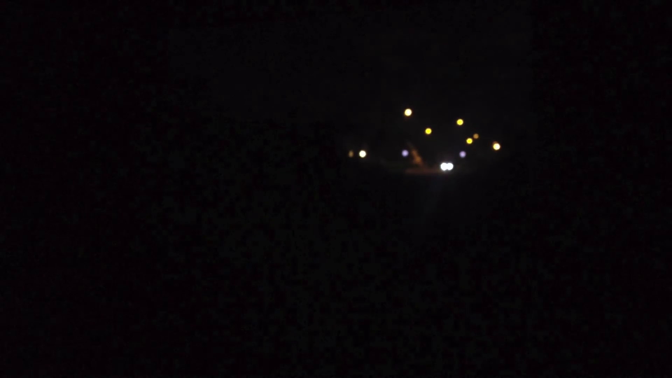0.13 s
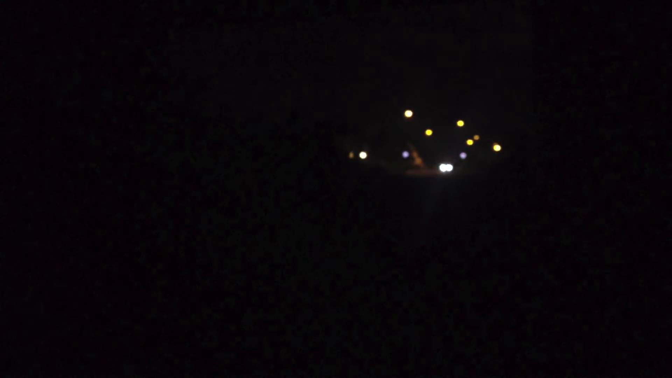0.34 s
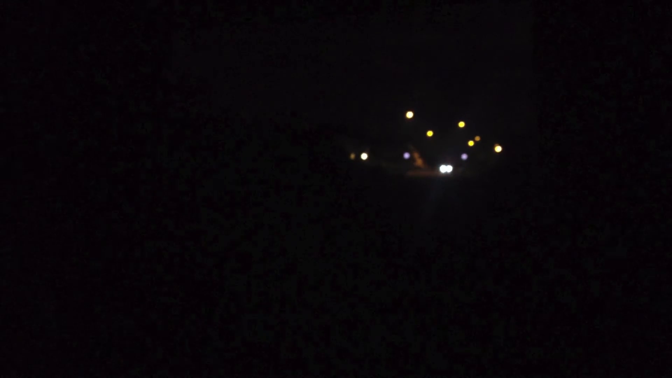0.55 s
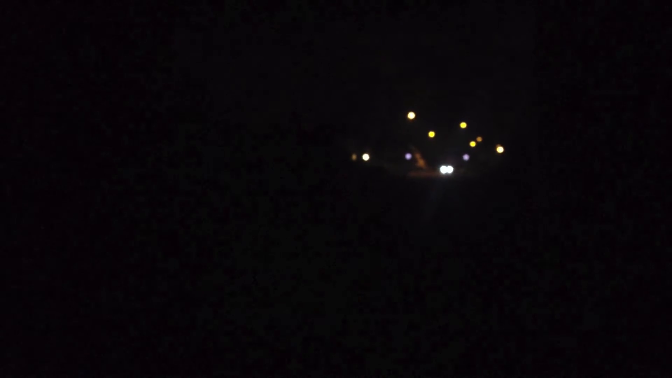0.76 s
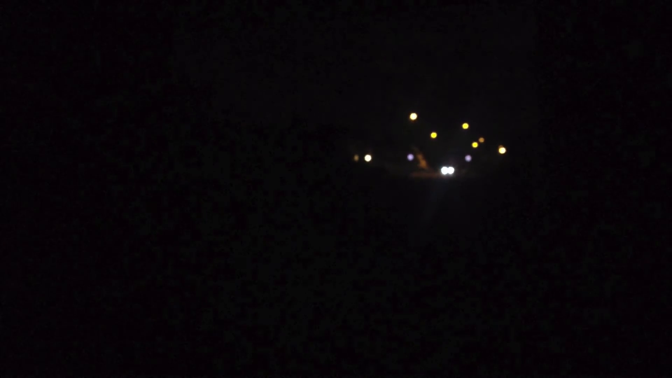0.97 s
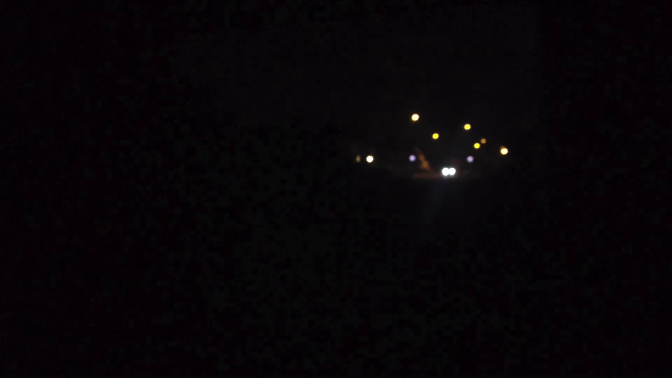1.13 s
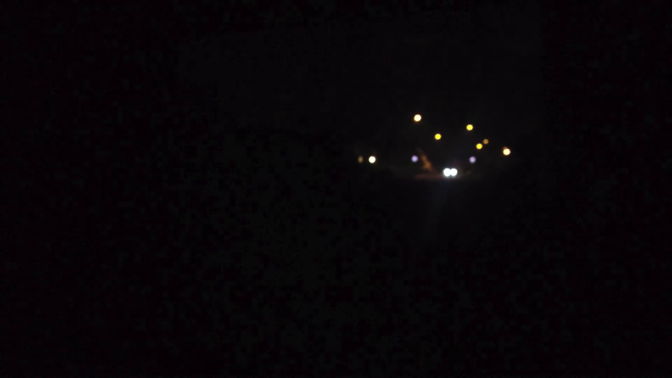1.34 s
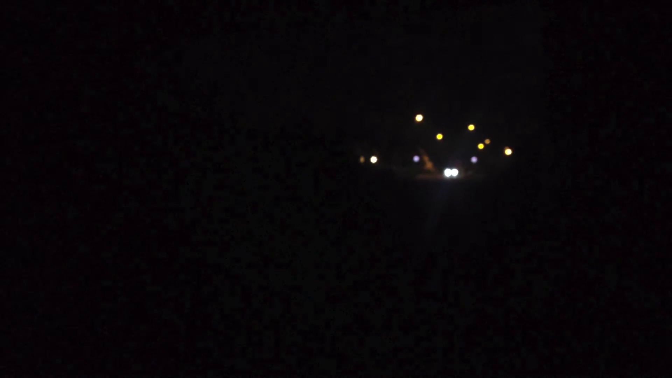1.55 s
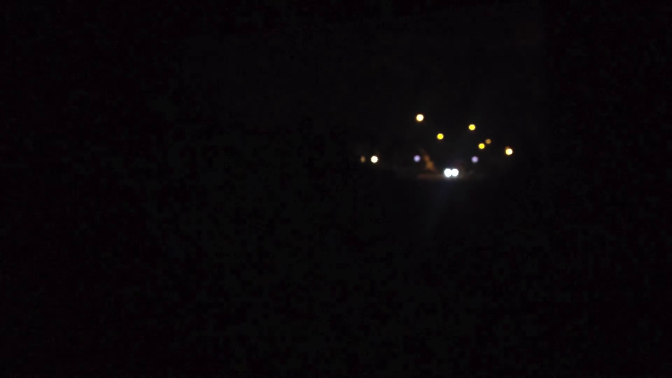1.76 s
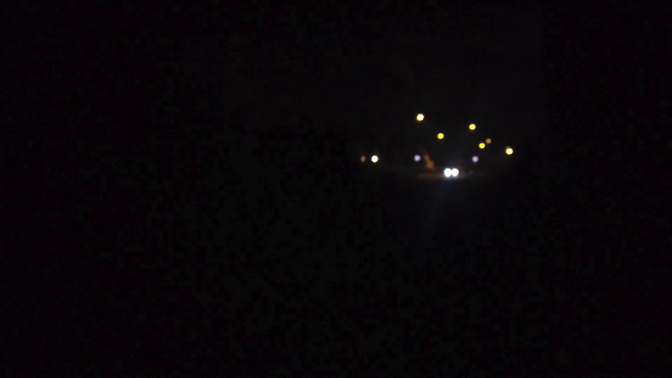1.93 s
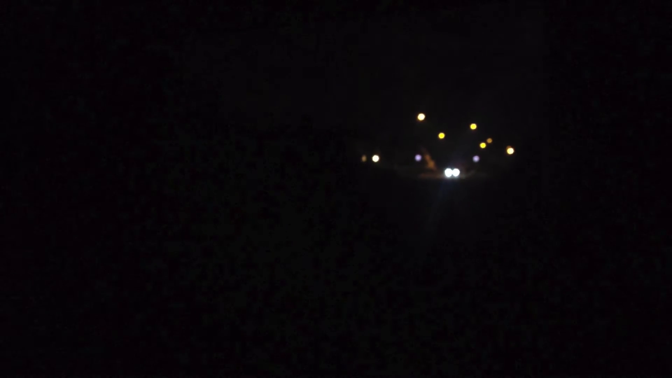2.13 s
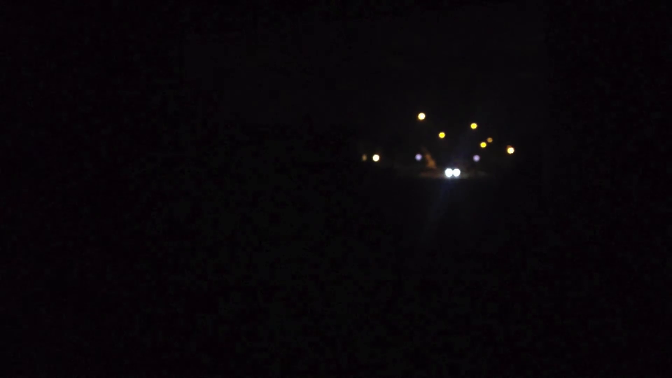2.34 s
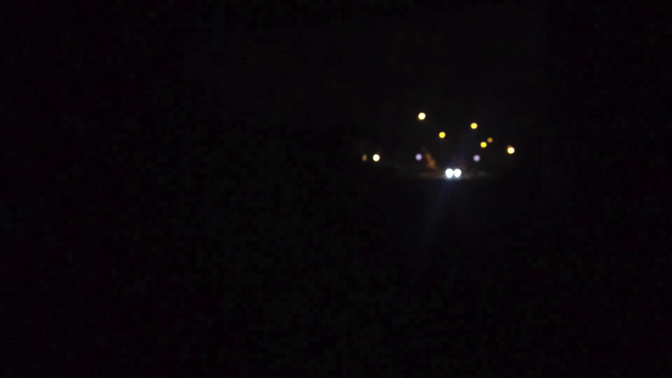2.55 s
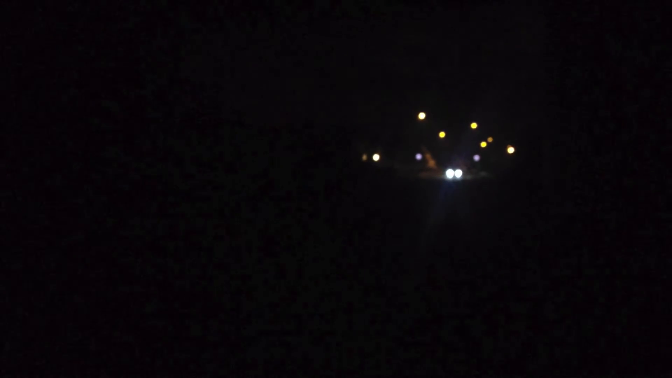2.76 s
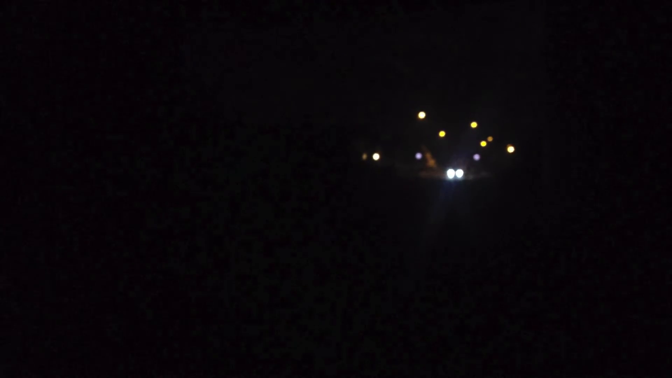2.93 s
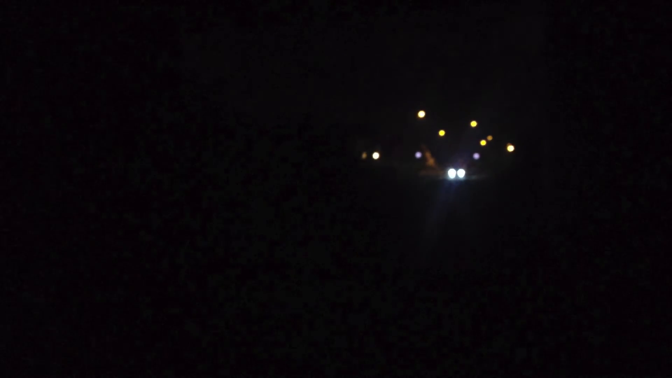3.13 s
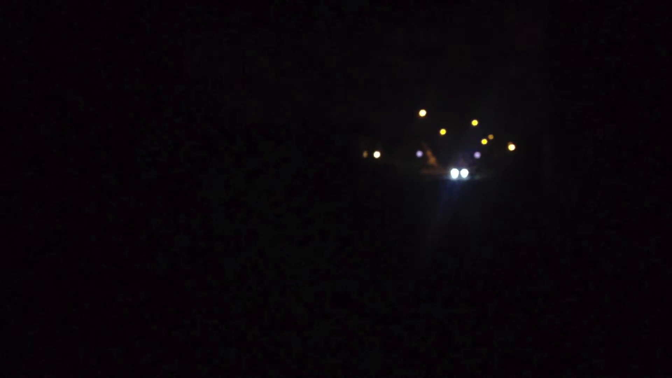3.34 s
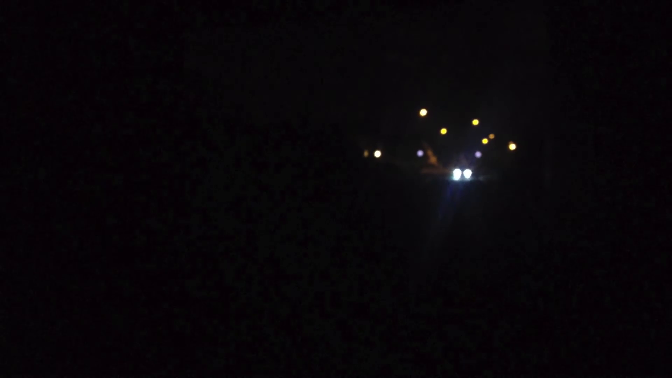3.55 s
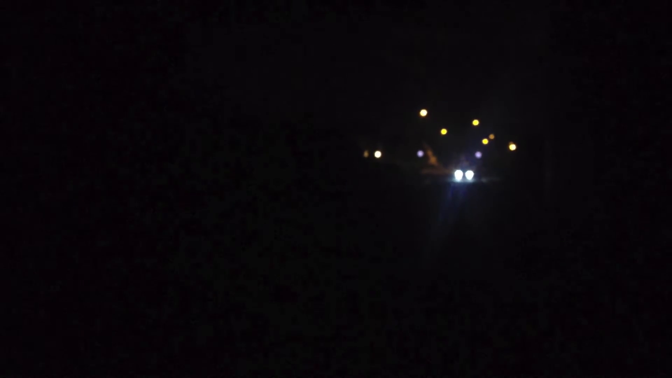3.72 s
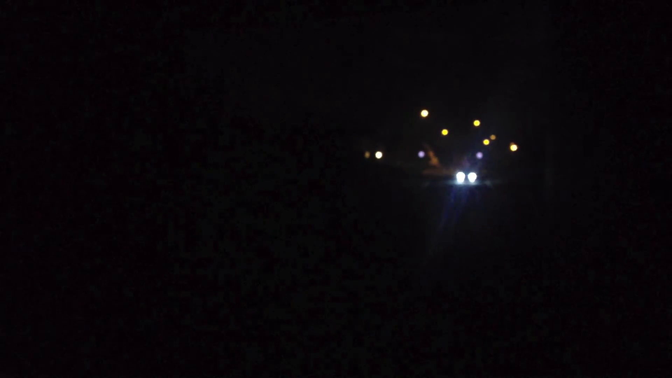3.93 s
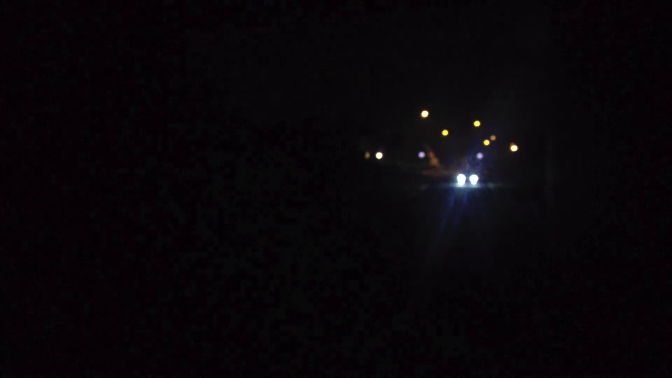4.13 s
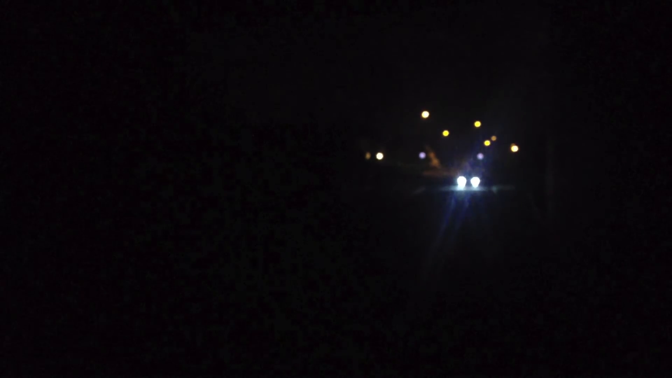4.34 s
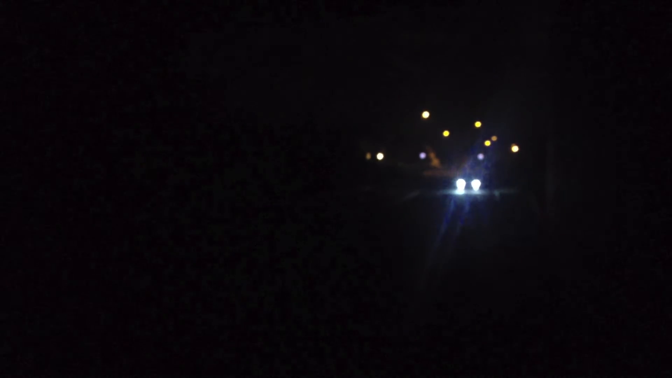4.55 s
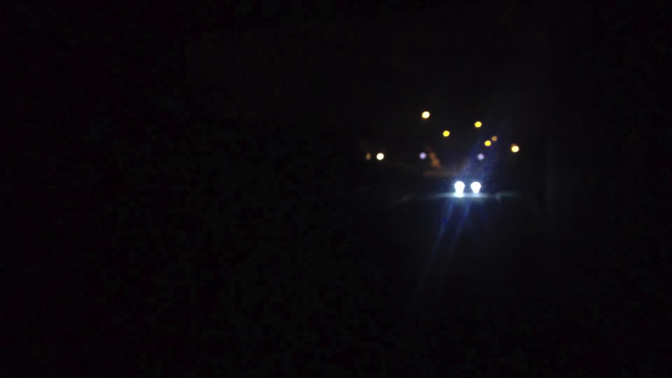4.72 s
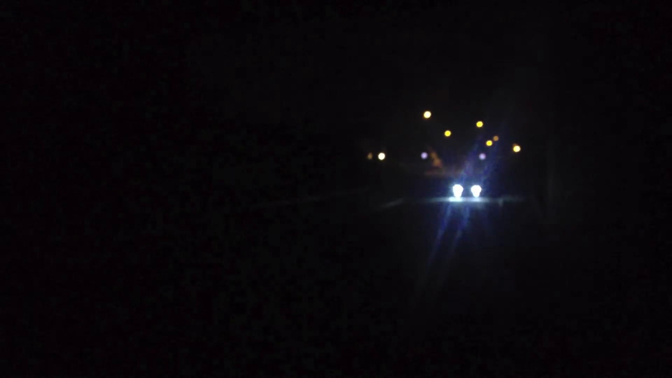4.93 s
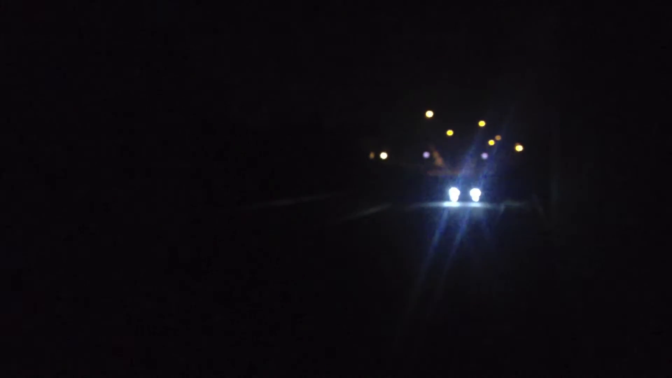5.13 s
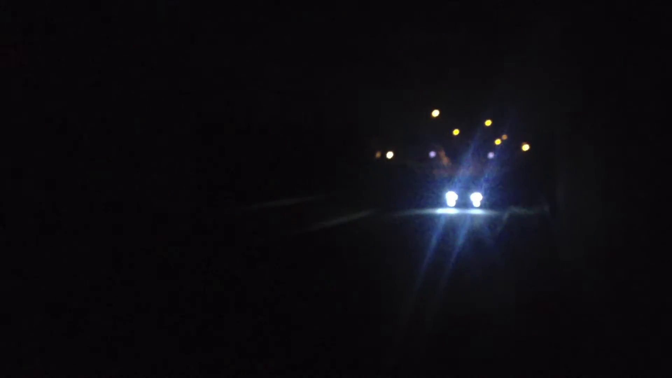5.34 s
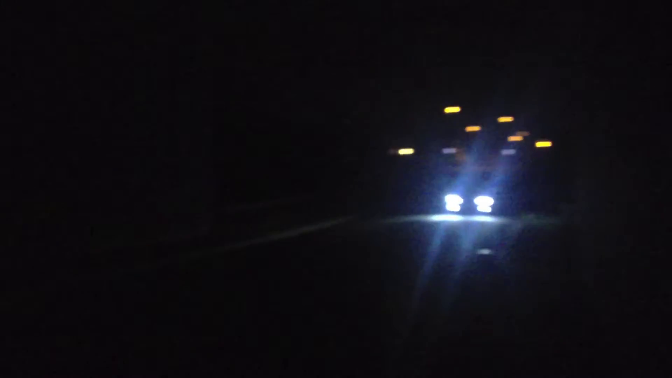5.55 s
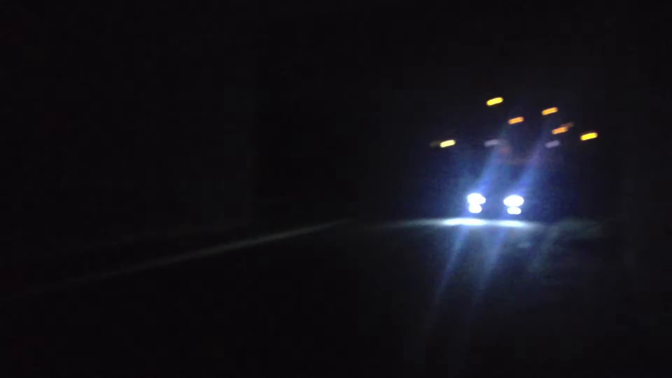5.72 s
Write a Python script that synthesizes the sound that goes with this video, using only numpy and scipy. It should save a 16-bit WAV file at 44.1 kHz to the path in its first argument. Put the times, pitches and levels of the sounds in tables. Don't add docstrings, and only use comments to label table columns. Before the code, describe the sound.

A dark, open roadside with soft microphone hiss. From 0 s a small four-cylinder car is heard far off, accelerating flat out: a steady, hollow intake drone around 190 Hz climbs smoothly to about 275 Hz by 1.75 s, with a weak airy rush. The throttle shuts at roughly 1.7 s; the drone thins and slides down quickly, with faint wavering metallic rings, to about 180 Hz near 2.3 s. Power returns with a short ringing accent, and the higher gear pulls, the pitch climbing more slowly to about 257 Hz by the end. From 3 to 5 s the sound grows nearer and brighter, with flickering raspy overtones and tyre and intake hiss. After 5 s it swells steeply, loud and slightly overdriven, with a short dull echo from the verges. Low air puffs thump the microphone from about 5.6 s; it stops at 5.8 s, with the car still arriving.

```python
import sys
import numpy as np
from scipy import signal
from scipy.io import wavfile
from scipy.ndimage import uniform_filter1d

SR = 44100
rng = np.random.default_rng(int(sys.argv[2]) if len(sys.argv) > 2 else 0)


def digitize_waveform(pressure):
    field = np.atleast_2d(pressure).T
    bounded = np.clip(field, -1, 1)
    quanta = np.round(bounded * 32767).astype(np.int16)
    wavfile.write(sys.argv[1], SR, quanta)


def gain_from_db(level_db):
    decades = np.asarray(level_db, float) / 20
    return 10 ** decades


N = 254898


def level(x, db):
    return x * gain_from_db(db) / np.sqrt(np.mean(x ** 2))


def curves(table):
    s, *columns = np.transpose(table)
    return [np.interp(np.arange(N) / SR, s, c) for c in columns]


def colour(table, hz):
    points = np.array(table)
    return np.interp(np.log(hz + 1), np.log(points[:, 0]), points[:, 1])


def walk(rate, size=N, per_s=SR):
    k = max(int(per_s / rate), 1)
    count = size + 1 if k == 1 else size // k + 1
    steps = np.repeat(rng.standard_normal(count), k)
    return 1.24 * uniform_filter1d(uniform_filter1d(steps, k), k)[:size]


def coarse(rate):
    return walk(rate, size=N // 64 + 2, per_s=SR / 64)[:-1]


def fine(x):
    return np.interp(np.arange(N) / 64, np.arange(len(x)), x)


def slow(rate):
    return fine(coarse(rate))


def bump(peak, length):
    s = np.arange(0, N, 64) / SR
    return np.exp(-np.abs(2 * (s - peak) / length) ** 3)


def noise(db_of):
    hz, s, z = signal.stft(rng.standard_normal(N), SR, nperseg=1024)
    at = np.minimum((s * SR).astype(int), N - 1)
    return signal.istft(z * gain_from_db(db_of(hz[:, None], at)), SR, nperseg=1024)[1][:N]


def driving():
    # (time [s], cycle rate [Hz])
    speed = [(0.0, 48.03), (0.37, 51.8), (0.72, 55.64), (1.14, 59.34), (1.7, 64.5), (1.75, 68.13),
             (1.79, 69.04), (1.98, 61.01), (2.19, 51.4), (2.31, 45.15), (2.4, 46.77), (2.69, 48.54),
             (3.06, 50.45), (3.48, 52.9), (4.07, 56.0), (4.54, 58.62), (5.09, 61.34), (5.78, 64.25)]
    # (time [s], effort at 1 m [dB], intake hiss brightness [dB])
    effort = [(0, -1.5, -1), (.4, 0, 8.5), (1.0, 1.5, 8), (1.5, 2.5, 7), (1.71, 4.5, 8.5), (2.15, -1, 4.5),
              (2.32, 3.5, 5), (2.6, 2, 3.5), (3.0, 2, 2), (3.7, 1.5, 6), (4.3, 1, 8), (4.96, 3, 6),
              (5.2, 2, 6.5), (5.45, 5, 6.5), (5.62, 4.5, 8.5), (5.78, 1, 7.5)]
    shut_s, open_s, pedal_s = 1.735, 2.225, 0.025
    start_m, start_m_s, gain_m_s2 = 168.55, 19.25, 2.01
    s = np.arange(N) / SR

    def step(at):
        return np.clip((s - at) / pedal_s + .5, 0, 1)

    far = start_m - start_m_s * s - gain_m_s2 * s ** 2 / 2
    shut = step(shut_s) - step(open_s)
    low_gear = 1 - step(open_s)
    return *curves(speed), far, *curves(effort), shut, low_gear


def night_floor():
    # (frequency [Hz], level per Hz [dB])
    floor_colour = [(20, -7.5), (55, -9.5), (150, -0.5), (1000, -14), (6000, -16), (9500, -31),
                    (13000, -25), (16000, -25.5)]
    return level(noise(lambda hz, at: colour(floor_colour, hz) + 0 * at), -66)


def air_puffs():
    # (time [s], length [s], level [dB])
    puffs = [
        (5.628, 0.037, 13),
        (5.677, .03, 7.5),
        (5.726, 0.035, 3),
        (5.77, .03, 8),
    ]
    far = driving()[1]
    puff_db = sum(db * bump(s, length) for s, length, db in puffs)
    gain = gain_from_db(-76.5) + gain_from_db(21) / far ** 3 * gain_from_db(fine(puff_db))
    rumble = signal.lfilter([1], [1, -.98], rng.standard_normal(N))
    return gain * level(rumble, 0)


def verges(x):
    t60_s, echo_db = 0.51, -19
    s = np.arange(SR) / SR
    tail = rng.standard_normal(SR) * gain_from_db(-60 * s / t60_s) * (s > .02)
    dull = signal.butter(N=1, Wn=[450, 2500], btype="band", fs=SR, output="sos")
    tail = signal.sosfilt(dull, tail)
    return signal.fftconvolve(x, level(tail, echo_db) / np.sqrt(SR))[:N]


def road_dip(hz, far):
    heights_m2 = 1.2
    octaves = np.log2((hz + 1) * 4 * heights_m2 / (343 * far))
    return -1.6 / (1 + (4 * octaves) ** 2)


def box_gain(hz):
    # (frequency [Hz], width [Hz], level [dB])
    modes = [(201, 66, -12), (320, 280, -1.5), (536, 150, -5), (570, 40, -5), (684, 110, -2.5),
             (757, 50, 0.5), (845, 58, -4), (1008, 96, -1.5), (1093, 41, -1), (1277, 61, -2),
             (1400, 200, -4.5), (1600, 140, -2), (1730, 92, -3.5), (2000, 210, -10), (2360, 230, -23.5)]
    return np.sqrt(sum(gain_from_db(2 * db) / (1 + (2 * (hz - f) / w) ** 2) ** 2 for f, w, db in modes))


def rush(turn):
    # (frequency [Hz], level per Hz [dB])
    rush_colour = [(60, -38.5), (120, -20), (230, -10), (450, -23.5), (700, -13.5), (1400, -13.5),
                   (2100, -13.5), (2600, -19), (4600, -26), (5200, -30.5), (8600, -35.5), (9700, -46.5),
                   (13000, -48.5), (15300, -58.5)]
    # (frequency [Hz], level [dB])
    low_gear_colour = [(60, -0.5), (105, -14), (180, 3), (600, 0.5), (880, -1), (1500, -0.7), (2080, 2.5),
                       (2900, 0)]
    # (frequency [Hz], width [Hz], level [dB])
    hollows = [(2850, 200, 2), (4180, 330, 2.5), (4840, 71, 3.5), (6230, 540, 3.5)]
    boom_hz, boom_shut_db = 190, -5
    _, far, effort_db, bright_db, shut, low_gear = driving()
    level_db = effort_db - 20 * np.log10(far)
    loss_db = bright_db - 0.174 * far

    def db_of(hz, at):
        air_db = loss_db[at] * (np.minimum(hz, 10500) / 7000) ** 1.315
        ring_db = 10 * np.log10(1 + 2.56 * box_gain(hz) ** 2)
        hollow_db = sum(db / (1 + (2 * (hz - f) / w) ** 2) for f, w, db in hollows)
        boom_db = boom_shut_db * shut[at] / (1 + (hz / boom_hz) ** 4)
        bands = (np.log2(hz[:, 0] / 100 + 1) * 3).astype(int)
        flicker = np.array([walk(9, size=len(at), per_s=SR / 512) for _ in range(26)])[bands]
        gust = walk(8, size=len(at), per_s=SR / 512)
        treble = np.clip(hz / 5000, 0, 1)
        streaks = uniform_filter1d(rng.standard_normal((len(hz), len(at))), size=3, axis=0)
        streaks = uniform_filter1d(streaks, size=24, axis=1)
        patchy_db = 1.26 * (1 - 0.77 * treble) * flicker + 0.36 * treble * gust
        patchy_db = patchy_db + 2.23 * streaks / streaks.std()
        source_db = colour(rush_colour, hz) + colour(low_gear_colour, hz) * low_gear[at] + level_db[at]
        return source_db + air_db + ring_db + hollow_db + road_dip(hz, far[at]) + patchy_db + boom_db

    throb = 1 + 0.035 * np.cos(turn) + 0.045 * np.cos(4 * turn)
    return gain_from_db(25.5) * noise(db_of) * throb


def rings():
    # (start [s], peak [s], end [s], frequency [Hz], level [dB])
    panel = [
        (0, .02, 0.039, 1397, -48.5),
        (1.9, 1.96, 1.98, 784, -45.5),
        (2, 1.52, 1.51, 1220, -45.5),
        (2, 2.324, 2.332, 1271, -40.5),
        (2.5, 2.521, 3.1, 1280, -47.5),
    ]
    s, out = np.arange(N) / SR, 0
    for start, peak, end, hz, db in panel:
        times = [start - .03, start, peak, end, end + .05]
        swell_db = np.interp(s, times, [-99, db - 2.0, db, db - 3.0, -99])
        tone = np.cos(2 * np.pi * hz * s + .5 * walk(25))
        out = out + np.sqrt(2) * gain_from_db(swell_db + 2.8 * walk(30)) * tone
    return out


def swell_gain(order):
    # (peak [s], length [s], order [-], level [dB])
    low_swells = [(0.52, 0.5, 8, -55), (1.32, 0.08, 8, -52), (1.45, 0.5, 8, -44), (1.74, 0.26, 8, -46),
                  (2.71, 0.12, 8, -45), (3.17, 0.36, 8, -45), (3.95, 0.5, 8, -47), (4.4, 0.36, 8, -51),
                  (4.85, 0.5, 8, -42), (4.97, 0.12, 8, -45), (5.32, 0.5, 8, -31), (5.36, 0.08, 8, -40),
                  (5.68, 0.26, 8, -35), (0.43, 0.5, 9, -56), (1.04, 0.5, 9, -47), (1.52, 0.26, 9, -41),
                  (3.33, 0.5, 9, -49), (3.91, 0.5, 9, -45), (4.49, 0.5, 9, -42), (4.62, 0.12, 9, -46),
                  (4.95, 0.5, 9, -30), (5.26, 0.18, 9, -38), (5.48, 0.15, 9, -24), (5.58, 0.12, 9, -29),
                  (5.72, 0.26, 9, -20), (0.17, 0.2, 10, -47), (0.33, 0.1, 10, -47), (1.06, 0.5, 10, -53),
                  (1.71, 0.18, 10, -44), (1.79, 0.07, 10, -39), (2.03, 0.08, 10, -47), (3.82, 0.5, 10, -46),
                  (4.34, 0.5, 10, -37), (4.42, 0.08, 10, -45), (4.73, 0.18, 10, -36), (5.15, 0.5, 10, -41),
                  (5.63, 0.08, 10, -34), (0.43, 0.5, 11, -53), (0.97, 0.5, 11, -49), (1.32, 0.14, 11, -41),
                  (1.6, 0.38, 11, -38), (1.9, 0.1, 11, -42), (2.33, 0.26, 11, -47), (2.66, 0.5, 11, -39),
                  (3.22, 0.5, 11, -36), (3.5, 0.12, 11, -37), (3.97, 0.5, 11, -39), (4.5, 0.5, 11, -47),
                  (4.94, 0.5, 11, -32), (5.15, 0.08, 11, -38)]
    mid_swells = [(5.46, 0.08, 11, -30), (5.51, 0.5, 11, -28), (5.7, 0.08, 11, -32), (0.91, 0.5, 12, -51),
                  (1.24, 0.2, 12, -40), (1.56, 0.34, 12, -37), (1.68, 0.08, 12, -44), (1.94, 0.12, 12, -41),
                  (2.07, 0.14, 12, -41), (2.66, 0.5, 12, -50), (3.32, 0.5, 12, -50), (3.88, 0.5, 12, -46),
                  (4.09, 0.08, 12, -43), (4.39, 0.5, 12, -37), (5.03, 0.36, 12, -35), (5.37, 0.27, 12, -24),
                  (5.54, 0.14, 12, -30), (5.67, 0.15, 12, -21), (5.77, 0.08, 12, -30),
                  (0.35, 0.08, 13, -49), (0.57, 0.5, 13, -51), (1.55, 0.18, 13, -42), (1.98, 0.08, 13, -41),
                  (2.32, 0.12, 13, -43), (2.95, 0.5, 13, -51), (3.45, 0.5, 13, -38), (3.91, 0.36, 13, -46),
                  (4.24, 0.5, 13, -38), (4.62, 0.5, 13, -47), (4.98, 0.12, 13, -34), (5.21, 0.12, 13, -39),
                  (5.62, 0.5, 13, -27), (5.77, 0.08, 13, -26), (1.07, 0.12, 14, -47), (2.55, 0.18, 14, -42),
                  (2.93, 0.5, 14, -38), (3.35, 0.36, 14, -41), (4.51, 0.12, 14, -42), (4.86, 0.5, 14, -33),
                  (5.23, 0.12, 14, -39), (5.65, 0.08, 14, -36), (1.07, 0.5, 15, -54), (2.48, 0.5, 15, -46),
                  (3.05, 0.36, 15, -48), (3.78, 0.5, 15, -39), (4.25, 0.36, 15, -45), (4.66, 0.26, 15, -38),
                  (5.11, 0.08, 15, -33), (5.63, 0.26, 15, -36), (0.06, 0.36, 16, -55)]
    high_swells = [(1.65, 0.36, 16, -50), (2.62, 0.36, 16, -39), (3.53, 0.5, 16, -39),
                   (3.91, 0.12, 16, -42), (4.61, 0.12, 16, -40), (5.08, 0.5, 16, -35),
                   (5.19, 0.08, 16, -38), (5.67, 0.5, 16, -29), (3.15, 0.26, 17, -44),
                   (3.63, 0.18, 17, -45), (4.86, 0.5, 17, -35), (5.53, 0.5, 17, -36), (1.46, 0.26, 18, -48),
                   (3.62, 0.36, 18, -45), (4.09, 0.5, 18, -36), (4.64, 0.5, 18, -40), (5.54, 0.18, 18, -35),
                   (1.08, 0.18, 19, -44), (4.83, 0.36, 19, -37), (5.35, 0.5, 19, -35),
                   (1.47, 0.36, 20, -48), (2.76, 0.26, 20, -48), (4.32, 0.36, 20, -44),
                   (4.96, 0.5, 20, -42), (5.49, 0.12, 20, -37), (1.41, 0.08, 21, -45),
                   (4.85, 0.18, 21, -36), (5.55, 0.36, 21, -32), (1.51, 0.5, 22, -50), (3.35, 0.5, 22, -50),
                   (4.25, 0.5, 22, -38), (4.68, 0.5, 22, -28), (5.03, 0.36, 22, -35), (5.48, 0.5, 22, -30),
                   (4.14, 0.18, 23, -44), (5.19, 0.5, 23, -31), (5.67, 0.12, 23, -36),
                   (3.01, 0.26, 24, -48), (3.55, 0.5, 24, -37), (4.05, 0.08, 24, -39), (4.36, 0.5, 24, -39),
                   (4.64, 0.12, 24, -39), (5.73, 0.5, 24, -33), (1.33, 0.5, 25, -49), (3.43, 0.5, 25, -44),
                   (4.29, 0.5, 25, -41), (5.02, 0.5, 25, -39), (5.75, 0.36, 25, -38), (1.04, 0.36, 26, -50),
                   (1.49, 0.26, 26, -48)]
    top_swells = [(2.85, 0.26, 26, -37), (3.44, 0.12, 26, -43), (3.76, 0.12, 26, -41),
                  (4.36, 0.26, 26, -40), (4.88, 0.5, 26, -34), (5.61, 0.5, 26, -36), (1.02, 0.5, 27, -49),
                  (1.6, 0.12, 27, -47), (2.6, 0.36, 27, -46), (3.55, 0.5, 27, -48), (4.06, 0.26, 27, -39),
                  (4.59, 0.5, 27, -35), (5.49, 0.12, 27, -32), (1.1, 0.5, 28, -50), (1.67, 0.5, 28, -52),
                  (2.33, 0.08, 28, -36), (4.03, 0.5, 28, -37), (4.61, 0.26, 28, -40), (5.1, 0.5, 28, -35),
                  (5.35, 0.08, 28, -34), (5.6, 0.08, 28, -34), (0.36, 0.36, 29, -49), (1.2, 0.5, 29, -48),
                  (2.74, 0.08, 29, -43), (3.8, 0.5, 29, -42), (4.46, 0.26, 29, -40), (5.15, 0.5, 29, -39),
                  (0.39, 0.5, 30, -54), (3.75, 0.12, 30, -42), (4.3, 0.5, 31, -38), (0.31, 0.5, 32, -53),
                  (1.57, 0.5, 32, -54), (3.87, 0.36, 32, -46), (4.88, 0.36, 32, -44), (5.36, 0.12, 32, -36),
                  (1.48, 0.26, 33, -44), (3.64, 0.5, 33, -49), (4.54, 0.5, 33, -43), (5.24, 0.5, 33, -39),
                  (1.51, 0.5, 34, -54), (4.34, 0.5, 34, -42), (5.19, 0.08, 34, -36), (1.38, 0.5, 35, -52),
                  (4.89, 0.5, 35, -44), (5.27, 0.08, 35, -35), (1.06, 0.5, 36, -52), (4.01, 0.36, 36, -45),
                  (4.49, 0.18, 36, -41), (4.81, 0.12, 36, -40), (5.15, 0.5, 36, -39)]
    swells = low_swells + mid_swells + high_swells + top_swells
    gain = sum(gain_from_db(db) * bump(s, 1.024 * length) for s, length, k, db in swells if round(k) == order)
    return gain + np.zeros(-(-N // 64))


def order_fade_db(order):
    # (time [s], length [s], order [-], level [dB])
    first_fades = [(.76, .03, 4, -5), (.78, .07, 5, -7), (.68, .05, 5, -4), (.9, .06, 5, 3),
                   (1.38, .05, 4, -3), (1.62, .1, 5, -7), (1.66, .08, 4, 3), (1.87, .04, 4, 2),
                   (2.14, .08, 4, 4), (1.98, .12, 6, 15), (2.0, .2, 3, -5), (5.4, .1, 5, -1),
                   (3.65, .1, 6, 1), (1.45, .25, 3, 4), (.25, .1, 4, -2), (.12, .1, 6, 3),
                   (2.65, .13, 4, 3), (2.75, .1, 7, 6), (3.9, .3, 7, -5), (4.5, .08, 7, -8),
                   (4.95, .08, 4, -4), (5.72, .07, 6, -7), (5.1, .05, 6, 4), (1.52, .06, 5, -3),
                   (4.9, .1, 5, -2), (5.64, .08, 5, 3), (5.76, .03, 4, -2), (2.25, .03, 6, 4),
                   (3.72, .05, 4, -4), (3.82, .12, 6, 5), (3.99, .03, 6, -8), (4.0, .04, 4, -1),
                   (4.1, .07, 5, 2), (4.265, .03, 5, -18), (4.24, .05, 6, -7), (4.33, .05, 6, 3),
                   (4.7, .1, 4, -9), (5.07, .04, 5, -4), (5.17, .04, 4, 3), (5.25, .08, 5, -5),
                   (5.4, .12, 4, -5), (5.53, .05, 6, 7), (5.65, .09, 4, 2)]
    further_fades = [(1.95, 0.14, 3, -9), (2.69, 0.2, 3, 8), (4.4, 0.2, 3, 6), (5.2, 0.12, 3, 7),
                     (0.19, 0.2, 4, -2), (0.62, 0.05, 4, -3), (4.59, 0.12, 4, 2), (5.52, 0.08, 4, -2),
                     (0.15, 0.03, 5, -6), (0.37, 0.05, 5, -4), (1.06, 0.03, 5, -6), (2.82, 0.08, 5, -3),
                     (3.72, 0.12, 5, 2), (4.36, 0.03, 5, -6), (4.93, 0.05, 5, -4), (2.12, 0.06, 6, 6),
                     (2.97, 0.05, 6, -5), (4.93, 0.03, 6, 9), (5.17, 0.03, 6, -13), (5.48, 0.12, 6, -6),
                     (0.1, 0.08, 7, -10), (0.98, 0.3, 7, 7), (2.72, 0.03, 7, 7), (4.46, 0.03, 7, -13)]
    fades = first_fades + further_fades
    fade_db = sum(db * bump(s, 2 * length) for s, length, k, db in fades if round(k) == order)
    return fine(fade_db + np.zeros(-(-N // 64)))


def intake_drone(turn):
    # (frequency [Hz], level at 1 m [dB])
    third = [(140, -21.5), (165, -17.5), (176, -9), (195, -11.5)]
    fourth = [(182, 3.2), (200, 8.8), (222, 8.5), (240, 6.9), (250, 9.6), (257, 11.7), (276, 13.3)]
    fifth = [(228, 6), (245, 6), (260, 11.5), (279, 11), (288, 6), (300, 2.5), (318, 4), (330, 0)]
    sixth = [(275, 1.5), (295, 3.5), (311, 9.5), (328, 5.5), (340, -0.5), (355, -7.5), (385, -12)]
    # (order [-], level with throttle shut [dB], level in lower gear [dB], wavering [dB])
    load = [
        (3, -16, 3.5, .5),
        (4, -5, 1.8, .4),
        (5, -22, -0.5, .5),
        (6, -11.5, -2.5, .7),
        (7, -4, -6.5, 1.5),
    ]
    hz, far, effort_db, _, shut, low_gear = driving()
    near_db = -20 * np.log10(far)
    lag = 2.05 + .7 * np.arctan((6 * hz - 339) / 6)
    out = np.zeros(N)
    for k, pipe, (_, shut_db, gear_db, waver_db) in zip(range(3, 8), (third, fourth, fifth, sixth, sixth), load):
        db = colour(pipe, k * hz) + near_db + 0.74 * effort_db
        db = db + shut_db * shut + gear_db * low_gear + order_fade_db(k)
        db = db + (k == 7) * -5.5 + waver_db * slow(20)
        phase = k * turn - (k == 6) * lag + (k == 3) * 1.1 + .07 * slow(20)
        out += np.sqrt(2) * gain_from_db(db) * np.cos(phase)
    return out


def box_orders(turn):
    hz, far, effort_db, _, shut, _ = driving()
    ring_db = -10 - 1.05 * 20 * np.log10(far) + 0.61 * effort_db
    out = np.zeros(N)
    for k in range(8, 46):
        order_hz = k * hz[::64]
        shut_db = (k % 4 > 0) * -2.5 * shut
        weak_db = (ring_db + shut_db)[::64] + 2.5 * coarse(5) + road_dip(order_hz, far[::64])
        weak = gain_from_db(weak_db) * box_gain(order_hz)
        strong = gain_from_db(-0.57) * swell_gain(k)
        flutter = gain_from_db(1.7 * coarse(22))
        phase = k * turn + rng.uniform(0, 2 * np.pi) + min(k / 24, .8) * slow(18)
        out += fine(np.hypot(weak, strong) * flutter) * np.cos(phase)
    return out


def engine():
    hz = driving()[0]
    turn = 2 * np.pi * np.cumsum(hz * (1 + 0.0017 * slow(30.18))) / SR
    return intake_drone(turn) + box_orders(turn), turn


def scene():
    drone, turn = engine()
    car = drone + rush(turn) + rings()
    return (car + verges(car) + night_floor())[None, :]


def top_cut(x):
    return signal.sosfilt(signal.butter(12, 15320, fs=SR, output="sos"), x)


def record(dry):
    bass_cut = signal.butter(N=4, Wn=122, btype="high", fs=SR, output="sos")
    thin = signal.sosfilt(bass_cut, dry)
    bent = np.tanh(0.61 * thin) / .6 + 0.1 * np.maximum(thin - .35, 0) ** 2
    return top_cut(bent + air_puffs())


dry = scene()
out = record(dry)
digitize_waveform(out)
```